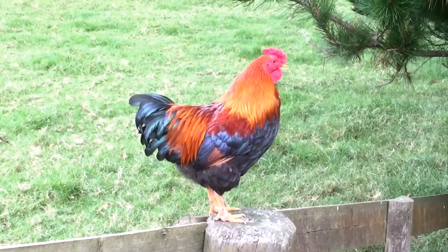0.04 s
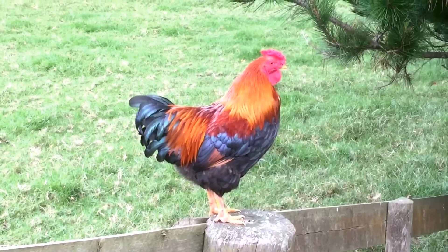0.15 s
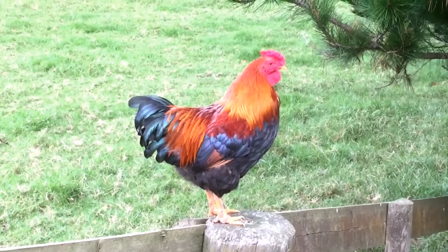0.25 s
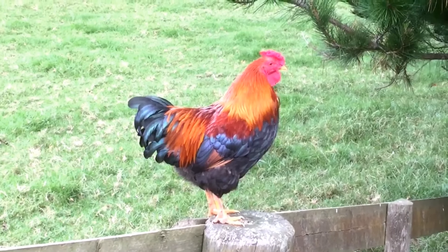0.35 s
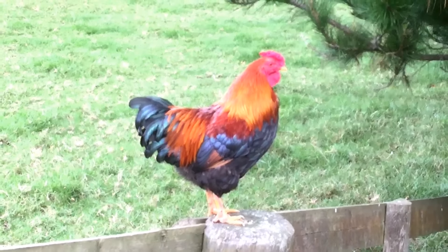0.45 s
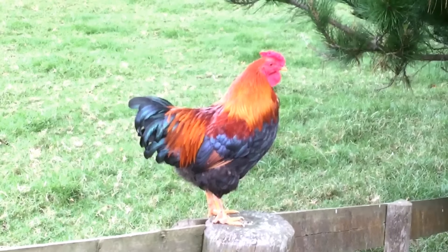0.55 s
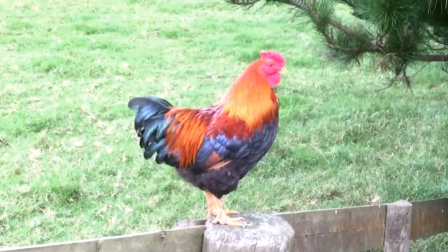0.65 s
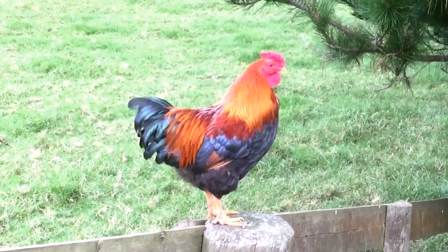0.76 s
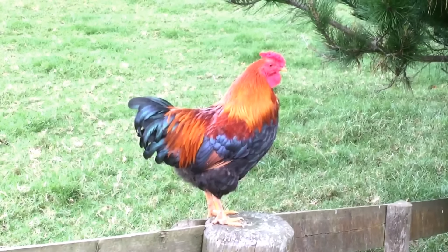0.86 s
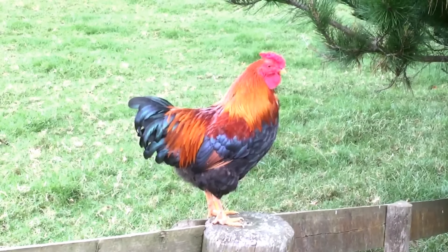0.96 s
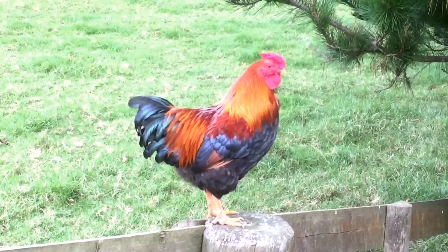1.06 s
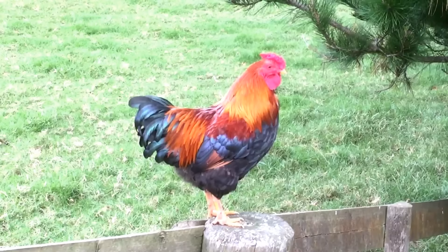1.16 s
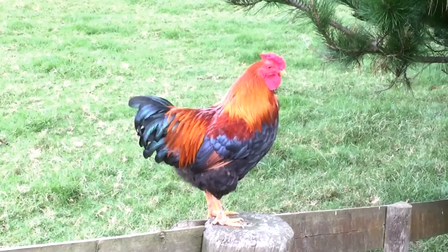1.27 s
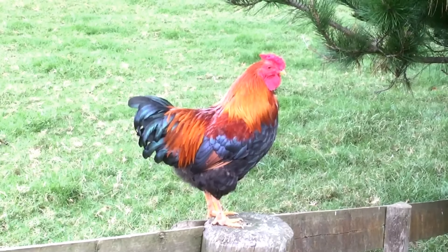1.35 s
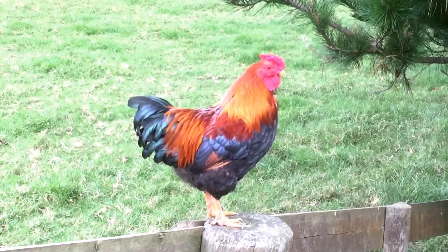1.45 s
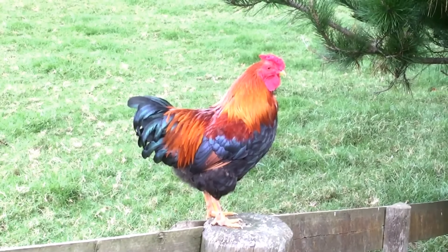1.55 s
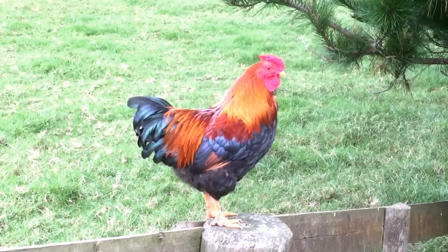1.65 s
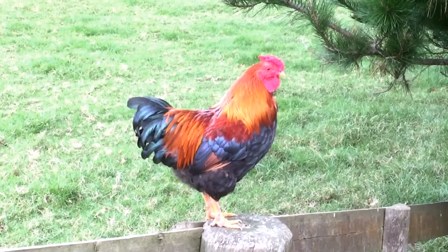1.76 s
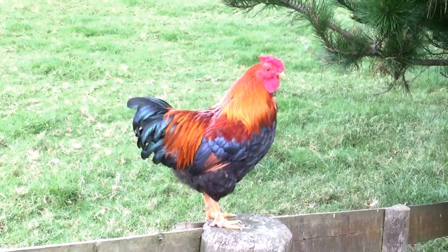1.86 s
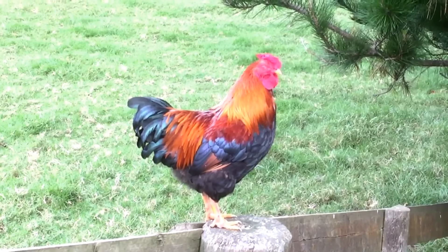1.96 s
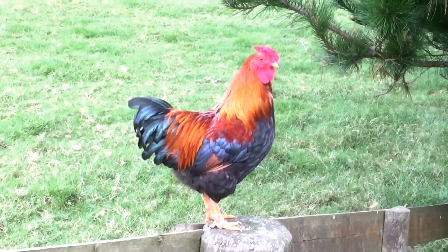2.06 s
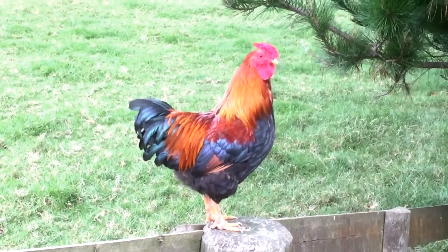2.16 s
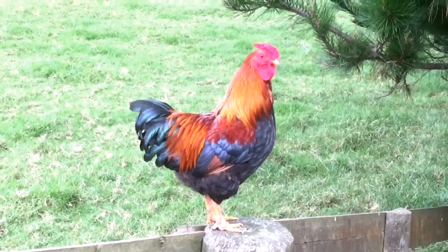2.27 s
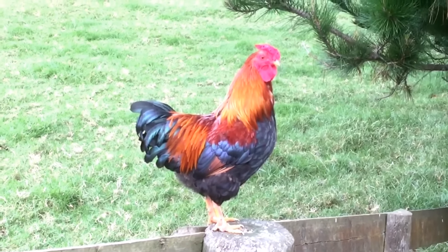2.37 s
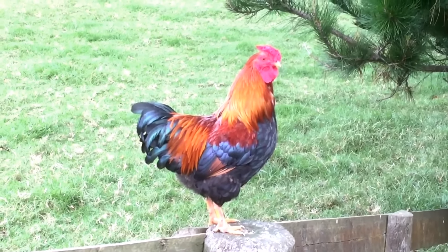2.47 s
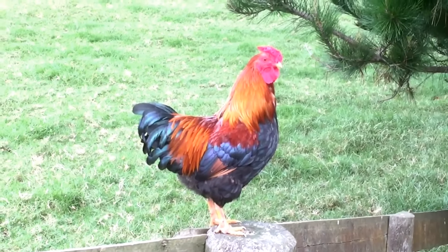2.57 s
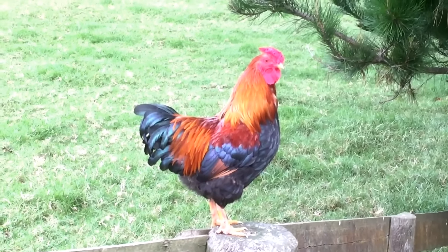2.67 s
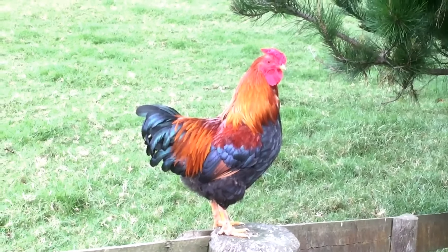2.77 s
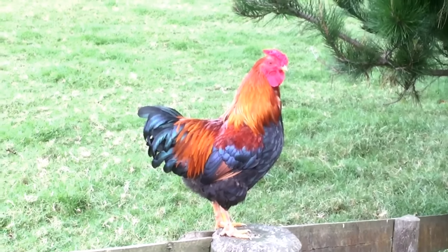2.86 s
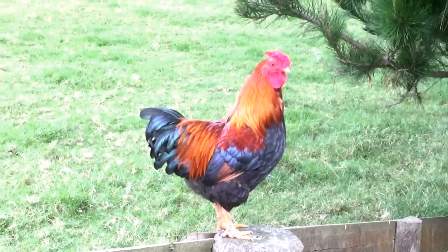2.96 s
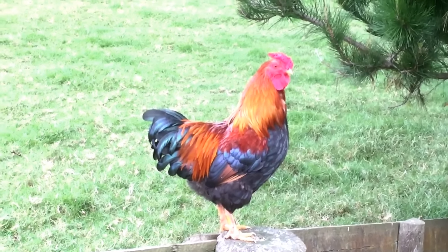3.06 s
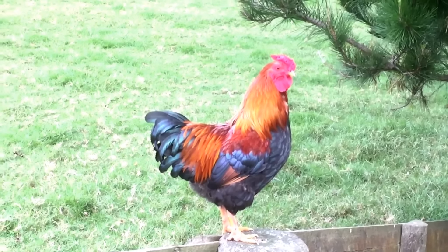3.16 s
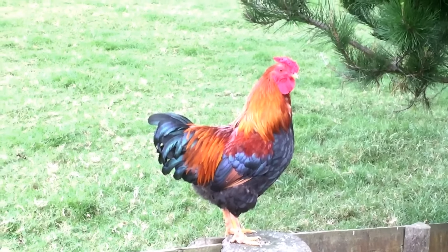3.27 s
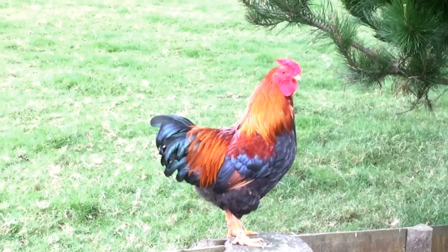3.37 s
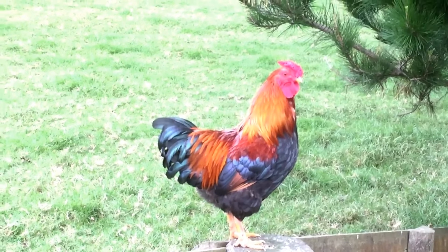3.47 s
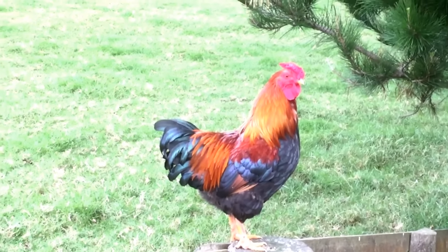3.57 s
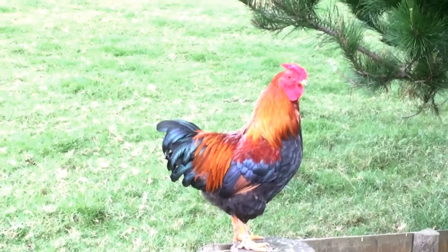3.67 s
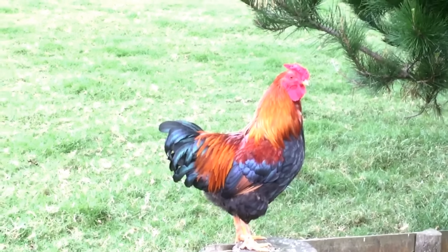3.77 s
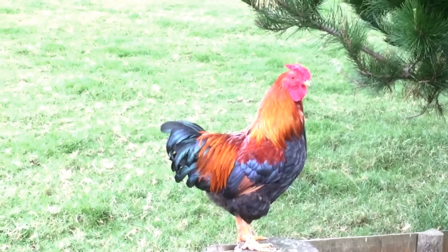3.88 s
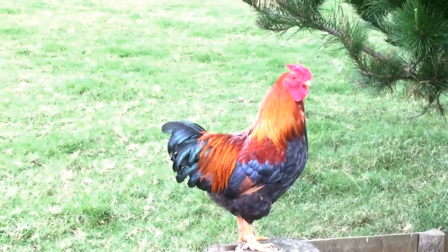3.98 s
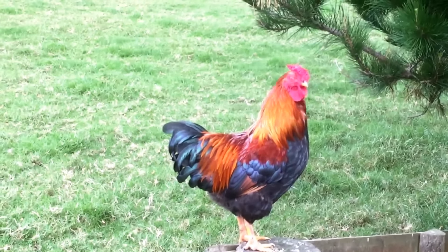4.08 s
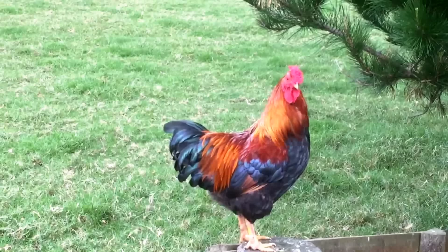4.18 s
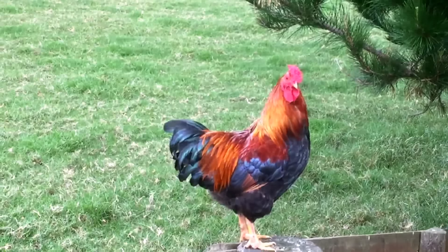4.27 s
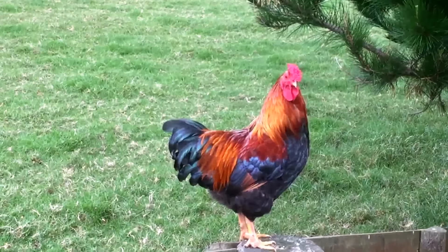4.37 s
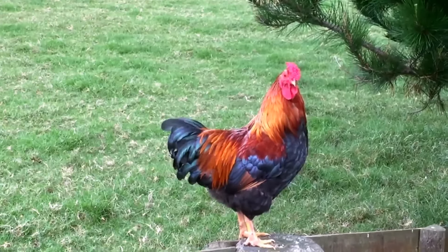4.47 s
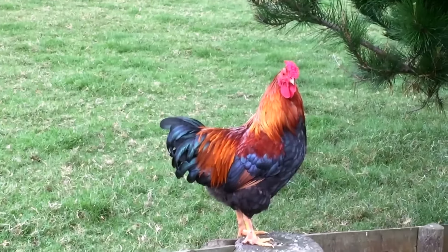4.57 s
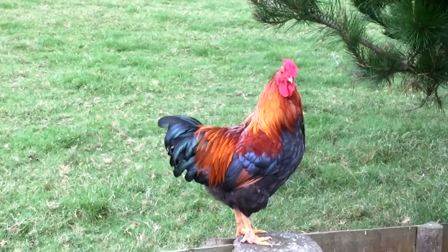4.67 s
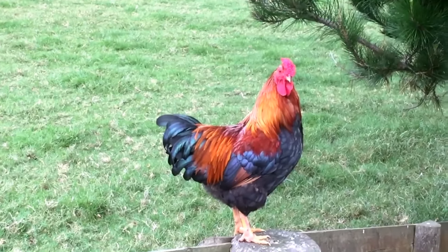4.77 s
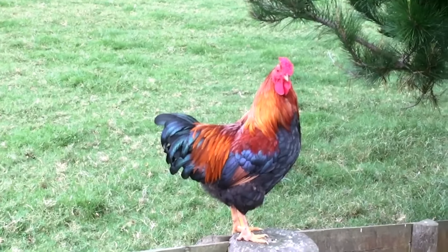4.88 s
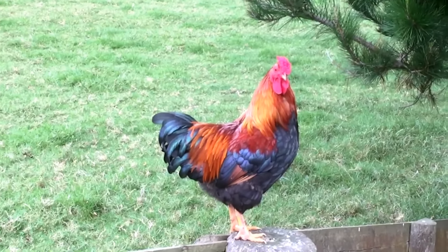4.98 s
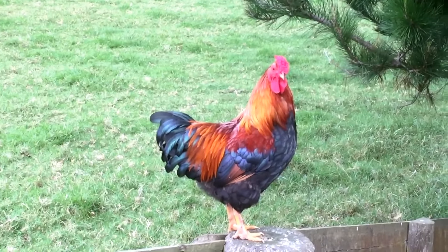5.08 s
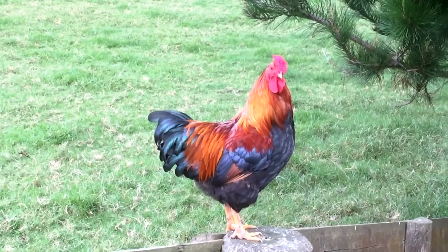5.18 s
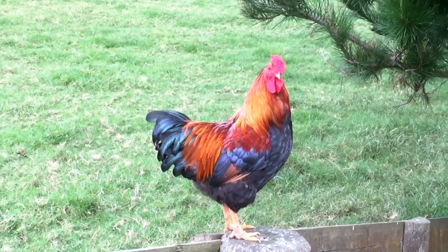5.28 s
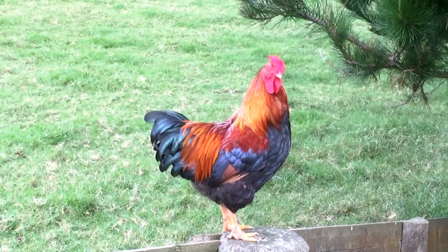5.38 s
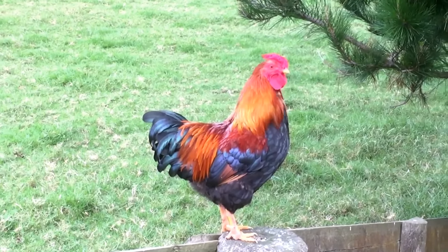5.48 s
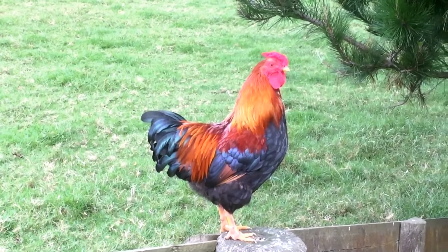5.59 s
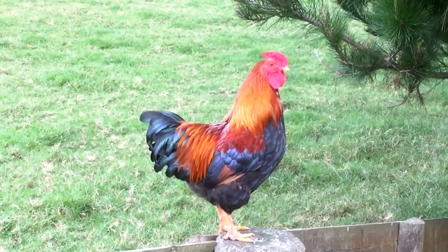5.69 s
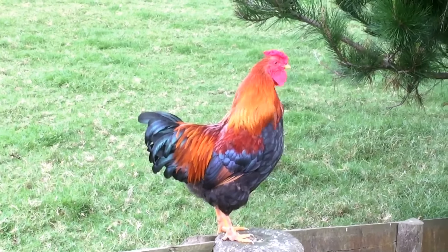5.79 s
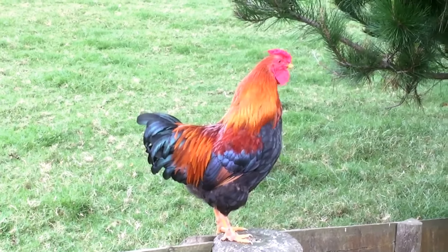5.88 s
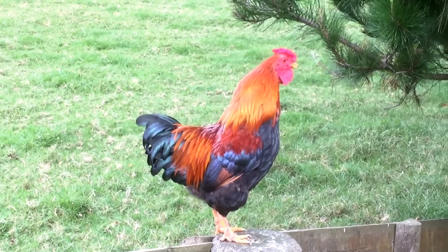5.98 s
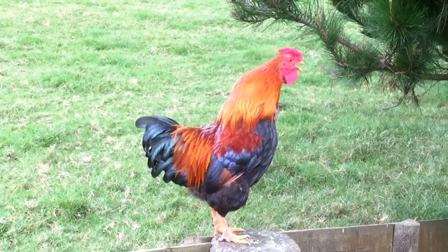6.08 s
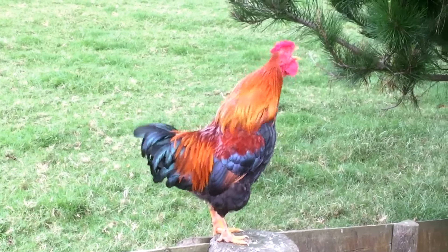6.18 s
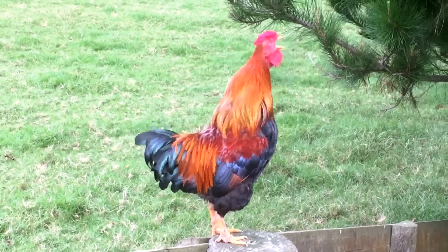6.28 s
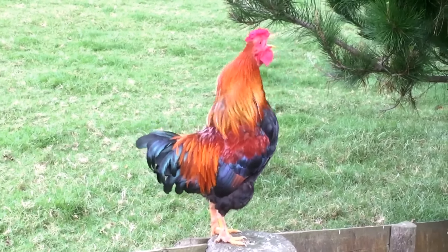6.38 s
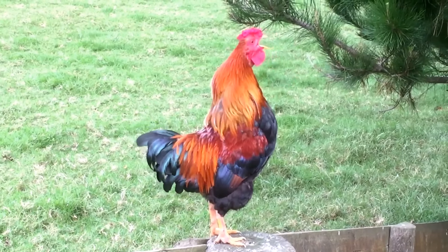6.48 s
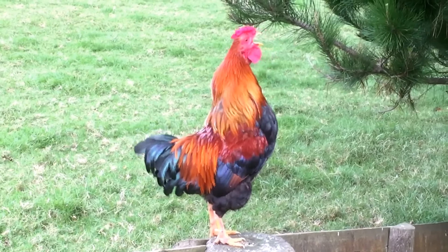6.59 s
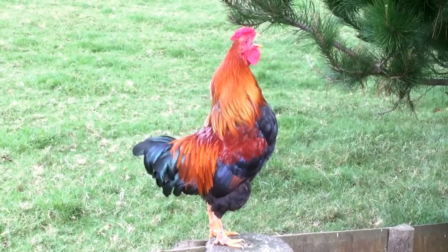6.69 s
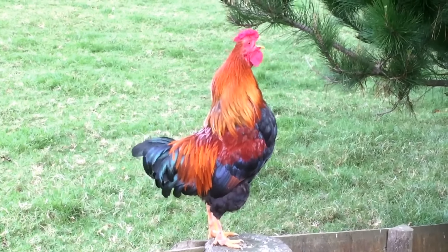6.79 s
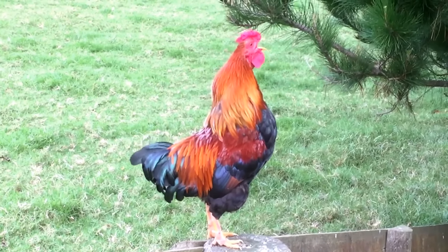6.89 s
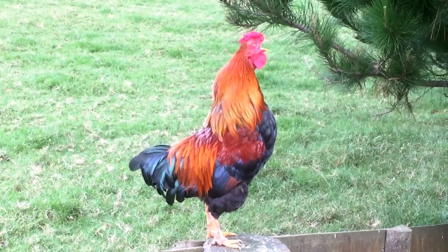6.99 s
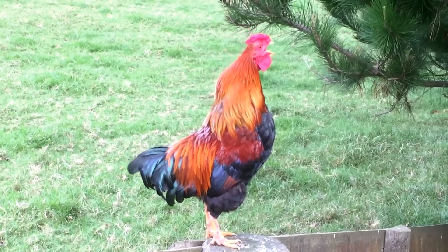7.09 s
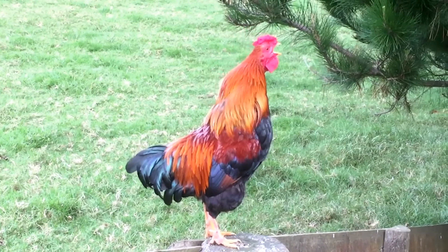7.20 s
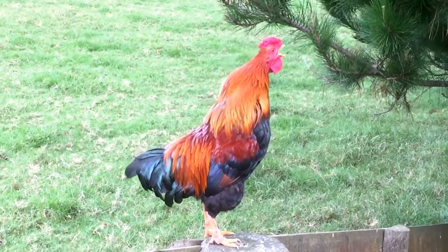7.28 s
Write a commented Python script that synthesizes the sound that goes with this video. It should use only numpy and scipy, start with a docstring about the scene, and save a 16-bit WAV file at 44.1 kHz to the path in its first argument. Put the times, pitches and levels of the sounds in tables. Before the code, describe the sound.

Distant traffic hums and a vehicle swells past outdoors, then a nearby rooster crows loudly with a hoarse, breaking voice.

```python
"""Traffic hums beyond a garden and one vehicle swells past on a wash of tyre noise; an insect and a
small bird chirp faintly, metal is tapped, and something ticks and rustles. Then, as the road noise
sinks, a rooster on a fence a few metres off crows: one short note, then a long one that keeps breaking
between registers. Its syrinx buzzes through throat and beak, turning hoarse at every break, and the
walls and fences of the yard throw back dull echoes."""
import sys
import numpy as np
from scipy import signal
from scipy.fft import rfft, irfft
from scipy.io import wavfile
from scipy.ndimage import uniform_filter1d

SR = 44100
rng = np.random.default_rng(int(sys.argv[2]) if len(sys.argv) > 2 else 0)


def dump_mix(stems):
    """Bounce the given channels to the path in sys.argv[1] as a 16-bit WAV at rate SR."""
    frames = np.atleast_2d(stems).T  # one column per channel
    limited = np.clip(frames, -1, 1)  # hard clip at full scale
    pcm = np.round(limited * 32767).astype(np.int16)
    wavfile.write(sys.argv[1], SR, pcm)


N = 323694
TIME = np.arange(N) / SR
FREQS = np.maximum(np.fft.rfftfreq(N, 1 / SR), 1)


def from_db(db):
    """Decibels to gain."""
    return 10 ** (np.asarray(db) / 20)


def response(points, hz):
    """Gain of an EQ curve at these frequencies."""
    at, db = np.transpose(points)
    return from_db(np.interp(np.log(hz), np.log(at), db))


def above(hz, edge_hz, order=16):
    """Soft high-pass gain: 0 well below the edge, 1 well above."""
    return 1 / (1 + (edge_hz / hz) ** order)


def noise(gain):
    """Noise at unit rms, coloured by a gain at each frequency."""
    x = irfft(rfft(rng.standard_normal(N)) * gain, N)
    return x / np.sqrt(np.mean(x ** 2) + 1e-20)


def drift(rate):
    """Random modulation at unit rms, about rate changes a second."""
    return noise(1 / (1 + (FREQS / rate) ** 2))


def smooth(x, seconds):
    """Round off steps over about this time."""
    size = max(int(seconds * SR), 1)
    return uniform_filter1d(uniform_filter1d(x, size), size)


def within(start, end):
    """True between two moments."""
    return (TIME >= start) & (TIME < end)


def bell(peak_s, half_s):
    """Bell-shaped envelope that peaks at 1."""
    return np.exp(-((TIME - peak_s) / half_s) ** 2 / 2)


def phase_of(hz):
    """Running phase of a moving pitch, in radians."""
    return 2 * np.pi * np.cumsum(hz) / SR


def bouts(rows, fade_s=.08):
    """Gain that fades in and out for each (start [s], end [s], level [dB])."""
    return sum(from_db(db) * smooth(1. * within(start, end), fade_s) for start, end, db in rows)


def swelling(steady_db, swells):
    """Gain of a steady bed with bell-shaped swells added in power."""
    swell_power = sum(from_db(db) ** 2 * bell(at, half) for at, half, db in swells)
    return np.sqrt(from_db(steady_db) ** 2 + swell_power)


def sinking(start_s=5.98, db_per_s=7.5):
    """Fade in dB: the road noise sinks as the crow begins."""
    return -db_per_s * np.maximum(TIME - start_s, 0)


def air(level_db=-68):
    """A faint, almost steady bed of outdoor hiss."""
    # colour of the hiss: (frequency [Hz], gain [dB])
    colour = [(300, 16.5), (2000, 7.5), (4000, 4.5), (6000, 4.5), (8000, 1.5), (10500, -3.5), (15500, -8)]
    return from_db(level_db + 0.23 * drift(2.0)) * noise(response(colour, FREQS))


def ground_bounce(x, delay_s=.00036, level_db=-9):
    """A slightly later copy off the ground swells and fades, combing the sound."""
    later = np.interp(TIME - delay_s, TIME, x)
    return x + later * from_db(level_db) * bell(peak_s=4, half_s=.5)


def traffic(rumble_db=-57, drone_db=-48.5, roar_db=-48, throb_db=1.4):
    """Rumble, engine drone and tyre roar from the distant road, sinking gently at the end."""
    # colour of each layer: (frequency [Hz], gain [dB])
    rumble_eq = [(20, -40), (35, -5), (60, 7), (90, 5.5), (125, 0), (200, -50)]
    drone_eq = [(70, -37), (115, -9.5), (170, -6.5), (225, 1.5), (280, -7), (360, -11), (500, -27),
                (800, -24), (1500, -51)]
    roar_eq = [(250, -26), (500, -8.5), (750, -1), (1400, 2.5), (2000, -2), (2600, -15), (3600, -22.5),
               (4800, -36.5), (7000, -50), (12000, -59)]
    # swells as vehicles go by: (peak time [s], half length [s], level [dB])
    rumble_swells = [(.38, 0.45, -52.5), (2.3, 0.37, -54), (5.1, 1, -50)]
    drone_swells = [(3.95, 0.83, -42)]
    roar_swells = [(1.2, 1, -49), (2.65, 0.54, -43.7), (5.7, 0.5, -51)]
    fade_db = sinking()
    rumble_gain = swelling(rumble_db, rumble_swells) * from_db(0.33 * fade_db)
    rumble = noise(response(rumble_eq, FREQS) * (1 - above(FREQS, 250, order=4)))
    drone_gain = swelling(drone_db, drone_swells) * from_db(0.47 * fade_db + throb_db * drift(35))
    drone = noise(response(drone_eq, FREQS) * (1 - above(FREQS, 1500, order=4)))
    roar_gain = swelling(roar_db, roar_swells) * from_db(0.47 * fade_db + .5 * drift(30))
    roar = ground_bounce(noise(response(roar_eq, FREQS)))
    return rumble_gain * rumble + drone_gain * drone + roar_gain * roar


def engines():
    """Single wavering engine notes rise out of the traffic and sink back."""
    # engine notes: (pitch [Hz], peak time [s], half length [s], level [dB])
    notes = [(59.7, 0.19, 0.45, -49.5), (60, 2.63, 0.62, -50.5), (227.5, 3.08, 0.96, -47),
             (344, 3.38, 0.25, -52), (216, 4.75, 0.44, -48.5), (126.7, 4.72, 0.22, -43),
             (148, 5.52, 0.73, -43.5), (72, 5.23, 0.55, -46.5), (729, 4.55, 0.22, -47.5)]
    out = np.zeros(N)
    for hz, at, half, db in notes:
        swell = from_db(db + 3.1 * drift(7.5)) * bell(at, half)
        pitch = hz * (1 + 0.01498 * drift(10.1) + 0.0254 * drift(85.8))
        out += swell * np.sin(phase_of(pitch))
    return out


def passing_vehicle(closest_s=5.29, pass_s=0.6, tyres_db=-39.5, hiss_db=-28, low_hz=450):
    """Tyre noise swells past, brightening as its upper edge climbs."""
    # colour of the tyre hiss: (frequency [Hz], gain [dB])
    hiss_eq = [(1800, -14), (2700, 7.5), (4200, -4), (5400, 4), (6500, -1), (7600, -14), (15000, -20)]
    brighten_s, brighten_span_s, dull_hz, bright_hz = 4.85, 0.8, 820, 2120
    level_db = tyres_db - 10 * np.log10(1 + ((TIME - closest_s) / pass_s) ** 2) + sinking()
    hz, frame_s, frames = signal.stft(noise(above(FREQS, low_hz, order=2)), SR, nperseg=1024)
    brightness = (1 + np.tanh((frame_s - brighten_s) / brighten_span_s)) / 2
    edge_hz = dull_hz + (bright_hz - dull_hz) * brightness
    low_pass = 1 - above(hz[:, None] + 1, edge_hz, order=14)
    makeup = np.sqrt(SR / 2 / np.maximum(edge_hz - low_hz, 100))   # evens the power as the band widens
    tyres = signal.istft(frames * low_pass * makeup, SR)[1][:N]
    hiss = from_db(hiss_db) * noise(response(hiss_eq, FREQS))
    return from_db(level_db) * (tyres + hiss)


def insect(pitch_hz=8800, width_hz=260, chirps_per_s=8.8):
    """An insect in the grass pulses a thin, high band of noise."""
    # bouts of chirping: (start [s], end [s], level [dB])
    chirping = [(.62, 2.05, -80), (2.7, 3.95, -79), (4.65, 5.8, -81.5)]
    pulse = np.sin(phase_of(chirps_per_s * (1 + 0.1 * drift(4.4))) / 2) ** 6
    band = 1 / (1 + ((FREQS - pitch_hz) / width_hz * 2) ** 4)
    return bouts(chirping) * from_db(2 * drift(5.5)) * pulse * noise(band)


def small_bird(chirps_per_s=19.0, top_hz=3830, fall_hz=300):
    """A small bird far off sings quick runs of falling chirps."""
    # runs of song: (start [s], end [s], level [dB])
    runs = [(.6, 1.396, -66), (3.4, 4.05, -66.5), (4.15, 4.88, -63.5), (5.3, 5.75, -66)]
    cycle = np.cumsum(chirps_per_s * (1 + .2 * drift(8.7))) / SR % 1
    pitch = top_hz - fall_hz * cycle + 140 * drift(200.7) + 40 * drift(12)
    chirps = np.sin(np.pi * cycle) ** 2 * np.sin(phase_of(pitch))
    return bouts(runs) * from_db(2 * drift(17)) * chirps


def metal_tap(at_s=.497):
    """A light, distant tap sets something metal ringing briefly."""
    # modes of the metal: (frequency [Hz], level [dB], time to fall 60 dB [s])
    modes = [(3030, -53, 0.16), (3170, -63, .12), (3450, -64, 0.092), (4130, -61, .12), (4290, -60, .12),
             (5550, -70, 0.37), (5640, -67, 0.22)]
    age = np.maximum(TIME - at_s, 0)
    return sum(from_db(db - np.minimum(60 * age / t60, 200)) * np.sin(2 * np.pi * hz * age)
               for hz, db, t60 in modes)


def ticks():
    """Dry ticks and rustles: short bursts of grainy noise, each with its own brightness."""
    # colour of the rustle: (frequency [Hz], gain [dB])
    rustle_eq = [(1500, 8), (3200, 8.5), (6200, -4.5), (12000, -8.5), (15500, -17)]
    # bursts: (time [s], level before filtering [dB], decay [s], band centre [Hz])
    bursts = [(.244, -58, .003, 8000), (.497, -55.5, 0.037, 3750), (3.02, -62, .02, 10000),
              (3.105, -52.5, 0.029, 8000), (3.301, -54, 0.0077, 6700), (3.403, -51.5, 0.022, 9000),
              (3.624, -43.5, 0.0096, 8500), (3.655, -61, 0.15, 6000), (5.98, -59, 0.034, 6000),
              (6.14, -53.5, .03, 5100)]
    grain = noise(response(rustle_eq, FREQS)) * from_db(3.5 * drift(300))
    out = np.zeros(N)
    for at, db, decay, hz in bursts:
        decays_gone = np.maximum(TIME - at, 0) / decay
        envelope = np.minimum(5 * decays_gone, 1) * np.exp(-np.minimum(decays_gone, 30))
        band = signal.butter(1, [hz * 0.76, hz * 1.15], "band", fs=SR)
        out += 2 * signal.lfilter(*band, from_db(db) * envelope * grain)
    return out


def yard(x, tail_db=-33, t60=1.0, dull_hz=4500):
    """Adds a few dull echoes and a thin scatter from trees and grass."""
    # echoes off walls and fences: (delay [s], level [dB])
    echoes = [(.022, -20.5), (.061, -26.5), (.105, -32)]
    age = TIME[:SR // 2]
    impulse = rng.standard_normal(len(age)) * from_db(-60 * age / t60) * (age > .008)
    impulse *= from_db(tail_db) / np.sqrt(np.sum(impulse ** 2))
    for delay, db in echoes:
        impulse[int(delay * SR)] += from_db(db)
    dulled = signal.lfilter(*signal.butter(1, dull_hz, fs=SR), impulse)
    return x + signal.fftconvolve(x, dulled)[:N]


def squeak(at_s=6.146, half_s=0.0065, pitch_hz=1620, level_db=-34.0, rolloff_db=-17):
    """A tiny, husky squeak from the throat just ahead of the crow."""
    phase = phase_of(pitch_hz * (1 + 0.0248 * drift(375)))
    tone = sum(from_db(rolloff_db * np.sqrt(k)) * np.sin((k + 1) * phase) for k in range(4))
    return from_db(level_db) * tone * bell(at_s, half_s)


def syrinx(syllables, low_ratio=.8, lock_s=0.02, lead_db_per_s=95, accent_s=0.013, unsteady_s=0.0099):
    """Tension and register set the pitch, level, colour and hoarseness of the voice."""
    # tension, one arch a syllable: (time [s], pitch of the middle register [Hz])
    tension = [(6.268, 890), (6.282, 885), (6.289, 805), (6.3, 835), (6.36, 885), (6.455, 888),
               (6.475, 850), (6.5, 830), (6.67, 850), (6.704, 962), (6.722, 989), (6.745, 999),
               (6.768, 979), (6.789, 920), (6.814, 800), (6.86, 868), (6.915, 982), (6.94, 950), (7.0, 970),
               (7.063, 950), (7.105, 910), (7.15, 928), (7.18, 897), (7.22, 800), (7.275, 872),
               (7.339, 902)]
    # upward flips of the voice under strain: (start [s], end [s], pitch [ratio])
    flips = [(6.343, 6.376, 1.045), (6.39, 6.396, 1.07), (6.413, 6.42, 1.11), (6.7, 6.791, 1.125),
             (6.92, 6.935, 1.125), (6.986, 7.021, 1.125), (7.039, 7.045, 1.085)]
    # what each register adds; octave, ring and edge lift the second harmonic, upper mids and treble:
    # (level [dB], octave [dB], ring [dB], edge [dB], roughness [amount], period doubling [amount])
    registers = np.array([(-1.5, 4.5, 5, 3.5, 0, 0.24),   # low
                          (0, 0, 0.0077, 0, 0.062, 0.056),   # middle
                          (-4, 1.5, -1.5, 3, 0.65, .5),   # flipped, within lock_s of a break
                          (1, 12.5, -8, 3.5, -0.12, 0)])   # a held flip locks into a clear, loud tone
    rows = np.array(syllables)
    rows[:, 1:3] += rows[:, :1]   # lengths to moments
    current = np.maximum(np.searchsorted(rows[:, 0], TIME) - 1, 0)
    _, crack_s, finish_s, lead_db, lead_octave_db, lead_rough = rows[current, :6].T
    level_db, accent_db, octave_db, ring_db, edge_db, doubling = rows[current, 6:].T
    lead_in = TIME < crack_s
    ratio = np.where(lead_in | (TIME > finish_s), low_ratio, 1.)
    since_fall = TIME.copy()
    for start, end, step in flips:
        ratio[within(start, end)] = step
        since_fall[TIME >= end] = TIME[TIME >= end] - end
    # falling back from a flip, the pitch overshoots and wobbles out
    wobble_hz, wobble_depth, wobble_s = 40.7, 0.031, 0.037
    wobble = wobble_depth * np.exp(-since_fall / wobble_s) * np.cos(2 * np.pi * wobble_hz * since_fall)
    pitch = np.interp(TIME, *np.transpose(tension)) * ratio * (1 - wobble * (ratio == 1))

    breaks = np.concatenate([rows[:, :3].ravel(), np.array(flips)[:, :2].ravel()])
    from_break = np.min([np.abs(TIME - s) for s in breaks], axis=0)
    register = np.select([ratio < 1, ratio == 1, from_break < lock_s], [0, 1, 2], 3)
    push = np.exp(-np.abs(TIME - crack_s) / accent_s)
    unsteady = np.exp(-from_break / unsteady_s)   # hoarse on either side of a break
    controls = [np.where(lead_in, lead_db - lead_db_per_s * (crack_s - TIME), level_db + accent_db * push),
                np.where(lead_in, lead_octave_db, octave_db + push),
                ~lead_in * ring_db,
                ~lead_in * edge_db,
                lead_in * lead_rough + 0.43 * unsteady,
                ~lead_in * doubling + 0.3 * unsteady]
    return pitch, controls + registers[register].T


def crow(syllables, throat, rasp_db, high_doubling_db, low_doubling_db=-15):
    """One note: the syrinx buzzes through the throat, stumbling and rasping at each register break."""
    jitter, waver, release_s = 0.02195, 0.00411, 0.0049
    shimmer_db, flutter_db, break_db, odd_db, hiss_db = 0.5, 3.5, -6, -5, -4
    start_s, end_s = syllables[0][0], syllables[-1][0] + syllables[-1][2]
    pitch, controls = syrinx(syllables)
    pitch = smooth(pitch, .002)
    level_db, octave_db, ring_db, edge_db, rough, doubling = [smooth(c, 0.0048) for c in controls]
    glide_speed = np.abs(np.gradient(np.log(pitch))) * SR
    breaking = smooth(np.clip(glide_speed / 32, 0, 1) ** 2, 0.003)
    rough = np.clip(rough + 0.37 * breaking, 0, 1.3)
    gate = smooth((TIME > start_s) * np.exp(-np.maximum(TIME - end_s, 0) / release_s), 0.0059)
    loudness = gate * from_db(level_db + break_db * breaking - shimmer_db * rough * drift(115))
    phase = phase_of(pitch * (1 + waver * drift(75.0) + jitter * rough * drift(433)))
    on = gate > 1e-4
    low_flutter, high_flutter = drift(36), drift(57)
    voice, power, treble_power = np.zeros((3, N))
    for multiple in np.arange(2, 45) / 2:
        hz = multiple * pitch[on]
        upper, treble = above(hz, 2480), above(hz, 3970)
        lift_db = octave_db[on] * (multiple == 2) + ring_db[on] * (upper - treble) + edge_db[on] * treble
        gain = response(throat, hz) * from_db(lift_db)
        if multiple % 2 == 1:   # in the treble the odd harmonics are the weaker ones
            gain *= from_db(odd_db * above(hz, 4600))
        if multiple % 1:   # strong and weak cycles alternate, adding lines between the harmonics
            low_lines = doubling[on] * from_db(low_doubling_db)
            high_lines = np.sqrt(np.abs(doubling[on])) * from_db(high_doubling_db)
            gain *= low_lines * (1 - treble) + high_lines * treble
        # each partial flutters on its own, the high ones most
        flutter = np.roll(high_flutter if multiple > 2 else low_flutter, rng.integers(N))[on]
        depth_db = flutter_db * (0.29 + 0.48 * upper + 0.5 * treble)
        partial = np.cos(multiple * phase[on] + rng.uniform(0, 2 * np.pi))
        voice[on] += gain * from_db(depth_db * flutter) * partial
        power[on] += gain ** 2 / 2
        treble_power[on] += treble * gain ** 2 / 2
    # turbulence, before the throat colours it: (frequency [Hz], gain [dB])
    rasp_eq = [(500, -27), (900, -12.5), (1400, 0.5), (1850, -5), (2350, 14.5), (2900, 7), (6000, 7)]
    colour = response(throat, FREQS) * above(FREQS, 700, order=8)
    rasp = from_db(rasp_db) * rough ** 1.5 * np.sqrt(power) * noise(colour * response(rasp_eq, FREQS))
    hiss = from_db(hiss_db) * rough ** .8 * np.sqrt(treble_power) * noise(colour * above(FREQS, 4500))
    breath = (rasp + hiss) * (1 + 0.093 * np.cos(phase))   # pulses lightly once a cycle
    return loudness * (voice + breath) / np.sqrt(power + 1e-12)


def hollows(x, notches):
    """Side branches of the airway swallow narrow bands of the voice."""
    for hz, width_hz in notches:
        band = [hz - width_hz / 2, hz + width_hz / 2]
        x = signal.sosfilt(signal.butter(2, band, "bandstop", fs=SR, output="sos"), x)
    return x


def rooster(beak_wide_s=6.6):
    """A squeak, a short note through a half-open beak, then a long one with the beak wide."""
    # throat response for each beak opening: (frequency [Hz], gain [dB])
    half_open = [(500, -50), (720, 6), (900, 4.5), (1400, 1.5), (1700, 8), (2150, -10), (2650, -30),
                 (3100, -32), (3500, -17.5), (3900, -41), (4500, -44), (5700, -16), (6400, -24.5),
                 (7100, -29), (9200, -43.5), (11800, -40.5), (15500, -54)]
    wide_open = [(550, -30), (720, 0), (900, 0), (1400, -6.5), (1950, 2), (2250, -8.5), (2600, -22),
                 (3050, -34), (3680, -10), (4100, -28), (4450, -33), (5000, -45), (5600, -33),
                 (6500, -25.5), (7000, -37), (7650, -20.5), (8700, -35), (11200, -40.5), (12700, -54),
                 (13800, -48), (15500, -52)]
    # bands that the airway swallows: (centre [Hz], width [Hz])
    half_open_notches = [(3950, 420)]
    wide_open_notches = [(3050, 160), (5000, 280)]
    # each syllable swells through a lead-in in the low register, then cracks up into the middle one:
    # (start [s], lead-in length [s], whole length [s]; lead-in: level [dB], octave [dB], roughness [0-1];
    #  after the crack: level [dB], accent [dB], octave [dB], ring [dB], edge [dB], period doubling [0-1])
    syllables = [(6.267, 0.019, 0.21, -13, -4.5, 0.55, -14, 4, 0, 3.5, 4.5, .08),
                 (6.673, 0.0094, 0.16, -16, 7, 0.661, -12, 5, -4.5, -2.5, -2, .15),
                 (6.809, .062, .389, -23, 5, 1, -13.5, 0.5, -3, 1, 0.5, 0.024),
                 (7.199, 0.073, .2, -19.5, 3, 0.13, -17, 3.5, -1, -0.5, 2.5, 0.88)]
    first = [row for row in syllables if row[0] < beak_wide_s]
    rest = [row for row in syllables if row[0] > beak_wide_s]
    short = crow(first, half_open, rasp_db=-4.5, high_doubling_db=-3)
    long = crow(rest, wide_open, rasp_db=-7, high_doubling_db=-8.5)
    return hollows(short, half_open_notches) + hollows(long, wide_open_notches) + squeak()


def scene():
    """The rooster and the ticks echo in the yard, over the road and the faint garden sounds."""
    voice, bed = rooster(), air()
    foreground = yard(voice + ticks())
    road = traffic() + engines() + passing_vehicle()
    garden = insect() + small_bird() + metal_tap()
    return (bed + road + garden + foreground)[None]


def record(dry, cutoff_hz=15400):
    """A steep low-pass takes off the very top."""
    return signal.sosfilt(signal.ellip(10, .2, 80, cutoff_hz, fs=SR, output="sos"), dry)


dry = scene()
out = record(dry)
dump_mix(out)
```